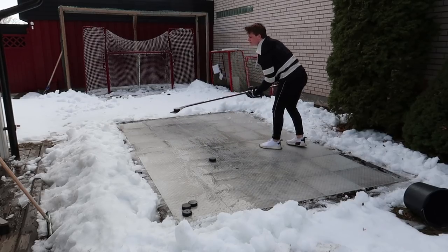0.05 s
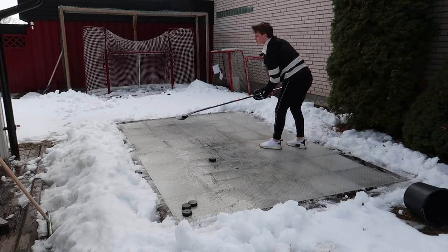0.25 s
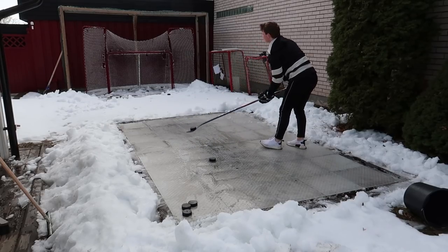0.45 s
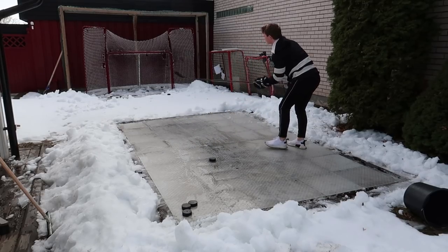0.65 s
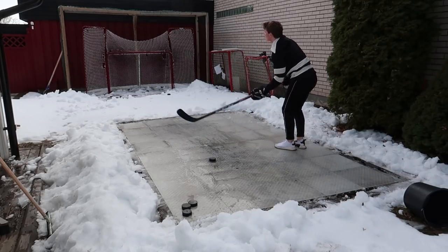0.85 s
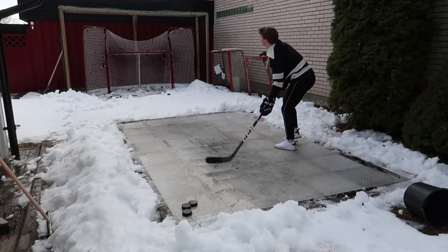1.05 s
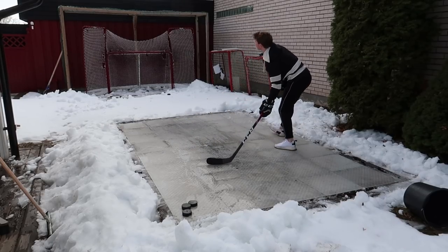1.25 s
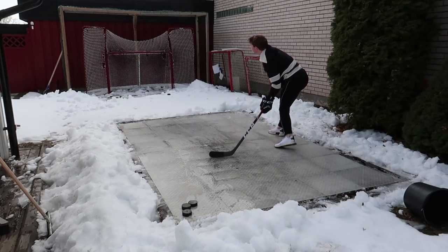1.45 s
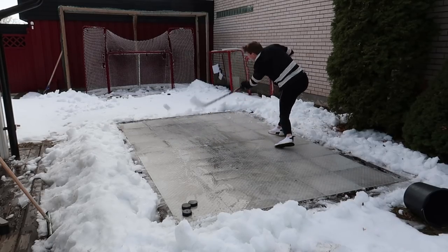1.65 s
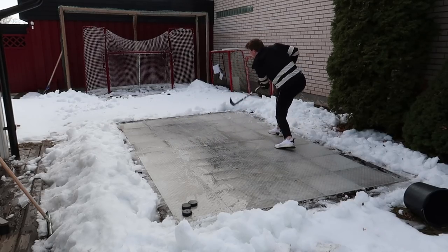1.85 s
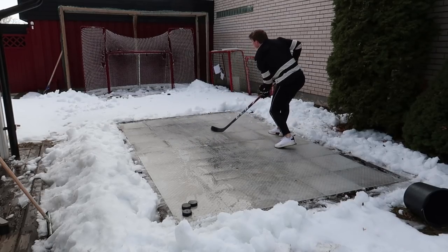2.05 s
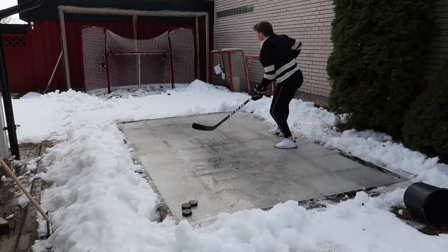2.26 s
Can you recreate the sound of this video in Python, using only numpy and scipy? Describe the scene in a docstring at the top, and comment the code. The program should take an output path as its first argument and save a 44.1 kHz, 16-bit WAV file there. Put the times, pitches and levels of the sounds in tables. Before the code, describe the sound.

A hockey stick cracks twice in a backyard: first slapping down on ice, then, after a short scrape, firing a puck. Gusty wind rumbles on the microphone until the shot, then drops away as a net rustles softly.

```python
"""Backyard, icy shooting pad: a hockey stick slaps down, drags the puck and fires it into a net.
Each contact cracks and rings blade and shaft; the two hardest overload the microphone.
House and fence echo them. Ice scrapes and sprays, shoes scuff, the mesh rustles.
Wind buffets the microphone in short, dull gusts, over faint hiss.
Wind noise and hiss both go quiet briefly after the loud shot, then return."""
import sys
import numpy as np
from scipy import signal
from scipy.fft import rfft, irfft, next_fast_len
from scipy.io import wavfile
from scipy.ndimage import uniform_filter1d, map_coordinates

SR = 44100
rng = np.random.default_rng(int(sys.argv[2]) if len(sys.argv) > 2 else 0)


def log_audio(samples):
    """Write samples as a 16-bit WAV file to the path given in sys.argv[1]."""
    # one column per channel
    frames = np.atleast_2d(samples).T
    # limit to full scale, then quantise
    limited = np.clip(frames, -1, 1)
    pcm = np.round(limited * 32767).astype(np.int16)
    wavfile.write(sys.argv[1], SR, pcm)


N = 101429

# wind at the microphone: time_s, rumble_db, flutter_db
WIND_LEVELS = [(0, -31.5, -66), (.14, -46, -58.5), (.26, -36, -49.5), (.35, -37.5, -49), (.385, -20, -33.5),
               (.435, -23.5, -33.5), (.475, -35, -48), (.49, -58, -79), (.53, -35, -68), (.58, -28, -65),
               (.635, -38.5, -58), (.68, -26, -43.5), (.725, -23.5, -60), (.75, -50, -55),
               (.81, -37.5, -73.5), (.87, -19.5, -33), (.93, -25, -26.5), (1.02, -25, -24),
               (1.1, -20.5, -31), (1.2, -26, -42.5), (1.35, -32, -37), (1.45, -25, -34.5),
               (1.6, -27, -28.5), (1.65, -25.5, -39), (1.71, -20.5, -27.5), (1.75, -44, -59.5),
               (1.82, -63, -73.5), (2.12, -70, -90.5), (2.145, -45, -82.5), (2.3, -43, -56)]
# single buffets: start_s, length_s, rumble_db, flutter_db, crackle_db
BUFFETS = [(0.031, 0.0093, -23.5, -29, -68), (0.088, 0.033, -29, -45, -70), (0.166, 0.017, -25, -42.5, -68),
           (.217, .016, -18, -31.5, -55), (0.299, 0.011, -21, -37.5, -67), (0.319, 0.013, -24.5, -41, -74),
           (0.374, 0.0072, -16.5, -18, -31), (.392, .006, -17, -27, -45), (0.416, 0.018, -17.5, -41, -55),
           (0.457, 0.016, -23, -37, -67), (0.548, 0.016, -26, -41.5, -71), (.585, 0.012, -20.5, -33, -58),
           (0.618, 0.012, -25, -51, -68), (0.653, 0.021, -21, -33, -73), (0.711, 0.0098, -22.5, -36.5, -71),
           (0.825, 0.0072, -18.5, -31, -63), (0.847, 0.0066, -17.5, -29, -50),
           (0.864, 0.017, -28, -19.5, -45), (0.91, 0.0071, -17, -21.5, -42.5),
           (0.94, 0.013, -18.5, -19.5, -34.5), (.971, 0.014, -30, -19.5, -31.5),
           (.991, 0.0048, -16.5, -14.5, -25), (1.014, .019, -15, -33, -44),
           (1.057, 0.0093, -18.5, -23.5, -28), (1.079, 0.0055, -18.5, -27, -33),
           (1.141, 0.021, -24.5, -23.5, -60), (1.207, 0.0042, -15, -24.5, -50),
           (1.261, 0.0052, -22, -37, -60), (1.499, .018, -31, -25, -34),
           (1.568, 0.047, -23.5, -25.5, -37.5), (1.854, 0.008, -44.5, -62, -80),
           (1.941, 0.034, -53, -75, -87), (2.135, 0.006, -39.5, -39.5, -38)]
# wind and hiss spectra (SIDE: left-right difference): freq_hz, relative_db
RUMBLE_SPECTRUM = [(20, -41.5), (60, -25.5), (110, -8), (200, 4.5), (300, 6.5), (450, 7.5), (650, -7.5),
                   (1000, -14), (1600, -43), (3000, -81)]
FLUTTER_SPECTRUM = [(250, -32.5), (550, 7), (850, 7), (1300, -2), (1900, -16), (2600, -28.5), (3600, -37),
                    (6000, -49.5), (15000, -69.5)]
FLUTTER_SIDE_SPECTRUM = [(60, -59), (250, -19.5), (550, 3.5), (950, 5.5), (1500, -0.5), (2200, -9.5),
                         (3600, -27), (6000, -34), (12000, -44.5)]
CRACKLE_SPECTRUM = [(400, -32), (1200, -1), (1900, 6), (2600, -8.5), (3400, -27), (6000, -44), (12000, -57)]
AIR_SPECTRUM = [(30, 8), (300, 7), (1000, 2), (2000, -4), (4000, -14.5), (8000, -23.5), (12000, -36.5),
                (16000, -47)]
AIR_SIDE_SPECTRUM = [(100, -21.5), (1000, -2.5), (2000, -2.5), (4000, -3), (8000, -7), (16000, -24)]
# outdoor hiss: time_s, level_db
AIR_LEVEL = [(0, -49.5), (1.2, -47), (1.9, -68), (2.3, -59.5)]
# ticks and clacks: start_s, level_db, pitch_hz, decay_s, hiss_re_ring_db
TICKS = [(0.169, -53, 4450, 0.0065, -14.5), (.645, -63, 13700, .003, 10.5),
         (1.2709, -11.5, 2880, 0.0028, -58)]
# shoe scuffs: peak_s, length_s, level_db
SCUFFS = [(0.213, 0.034, -51.5), (0.752, 0.029, -51.5), (1.104, 0.008, -43.5)]
# deep pushes of air: peak_s, length_s, level_db
PUSHES = [(0.227, 0.035, -25), (.40, 0.11, -29), (.592, 0.031, -32.5)]
# blade contacts: start_s, level_db, puck_share, crack_offset_db
BLOWS = [(1.2163, 1.5, 0, -8), (1.5126, -20.5, 0.6, -34), (1.6654, -14.5, 0.4, -21.5),
         (1.7024, -16, 0.6, -3.5), (1.7045, -14, 0.6, -1.5), (1.716, -11, 1, -4), (1.7206, 6, 1, -2.5),
         (1.733, -11.5, 1, -6.5)]
# blade and shaft modes: pitch_hz, t60_s, on_pad_db, on_puck_db
STICK_MODES = [(424, 0.024, 0, -13), (653, 0.025, 6, -0.5), (933, .028, 3.5, 1), (1311, .02, 7, 2),
               (1663, 0.043, -1.5, -1.5), (1862, 0.013, 6, -23.5), (2433, 0.033, -12.5, 2.5),
               (2630, 0.011, 7, -16.5), (3140, .02, -2, -5.5), (3244, 0.019, 5.5, 4.5),
               (3760, 0.024, -11.5, -4), (4560, 0.034, -11, -19.5), (4660, 0.013, -35, -18.5),
               (6210, 0.0089, -12, -27.5)]
# pad modes: pitch_hz, t60_s, offset_db
PAD_MODES = [(130, .025, -26.5), (330, 0.0089, -21)]
# blade and puck scraping: time_s, level_db
DRAG_LEVEL = [(1.22, -54), (1.24, -38), (1.33, -44), (1.39, -53), (1.5, -53), (1.53, -41), (1.58, -38.5),
              (1.62, -37.5), (1.64, -33.5), (1.66, -38), (1.695, -34.5), (1.73, -39), (1.75, -59.5)]
# puck in the net: start_s, level_db, attack_s, decay_s
NET_HITS = [(2.016, -43.5, 0.04, 0.033), (2.085, -53, 0.0043, 0.055), (2.127, -50, 0.0072, 0.034)]
# contact and echo spectra: freq_hz, relative_db
CRACK_SPECTRUM = [(100, -19.5), (500, -2.5), (1500, 0.5), (3500, -1), (5500, -8), (9000, -23), (13000, -26),
                  (16000, -39.5)]
SCRAPE_SPECTRUM = [(400, -22), (1000, -10), (2000, -1.5), (3400, -3), (4800, -12.5), (7000, -19.5),
                   (10000, -41), (15000, -55.5)]
SPRAY_SPECTRUM = [(2000, -20), (5000, 5), (8000, -1), (12500, 0), (14000, -13), (16000, -17)]
NET_SPECTRUM = [(300, -20), (900, -2), (2200, 3.5), (4000, -4), (6000, -6), (8500, -16.5), (12000, -40)]
YARD_SPECTRUM = [(150, -16), (500, -17.5), (1000, -3), (2000, 3), (3500, 0), (6000, 3), (9000, -10.5),
                 (14000, -42)]
# wall echoes: delay_s, smear_s, level_db
ECHOES = [(0.013, 0.003, -24), (0.0469, 0.0041, -25), (0.0544, .006, -25.5), (.077, .009, -36),
          (0.109, 0.019, -38.5)]
# phase lead of the left microphone port: freq_hz, lead_rad
PORT_PHASE = [(0, 0), (1300, -1.1), (2500, 0.45), (4000, 1.1), (5500, 1.65), (10000, 1.8), (14000, 2.1)]
# stereo width as the blade moves off axis: time_s, side_db
BLADE_WIDTH = [(1.22, -8.5), (1.7, -0.5)]


def undb(db):
    """Decibels to gain."""
    return 10 ** (np.asarray(db) / 20)


def curve(table, column=1):
    """Table column, interpolated linearly in time."""
    rows = np.array(table)
    return np.interp(np.arange(N) / SR, rows[:, 0], rows[:, column])


def colour(x, spectrum):
    """Minimum-phase filter; white noise keeps its power."""
    size = 2 * next_fast_len(N)
    hz, db = np.array(spectrum).T
    bins_hz = np.arange(size // 2 + 1) * SR / size
    gain = undb(np.interp(np.log(bins_hz + 1), np.log(hz), db))
    gain /= np.sqrt(np.mean(gain ** 2))
    cepstrum = irfft(np.log(gain))
    cepstrum[1:size // 2] *= 2
    cepstrum[size // 2 + 1:] = 0
    return irfft(rfft(x, size) * np.exp(rfft(cepstrum)))[..., :N]


def grains(rate_per_s, spread_db):
    """Random pulses of uneven size, rms 1."""
    pulses = (rng.random(N) < rate_per_s / SR) * rng.choice([-1, 1], N)
    pulses = pulses * undb(spread_db * rng.standard_normal(N))
    return pulses / pulses.std()


def flicker(rate_hz=90, step_db=3):
    """Quick random level swings, as a gain."""
    hold = int(SR / rate_hz)
    steps = np.repeat(rng.standard_normal(N // hold + 1), hold)[:N]
    return undb(step_db * uniform_filter1d(steps, hold // 2))


def swells(t, table):
    """Sum of bell-shaped envelopes."""
    return sum(undb(db) * np.exp(-(2 * (t - peak_s) / length_s) ** 2) for peak_s, length_s, db in table)


def stereo(mid, side):
    """Mid/side to left/right."""
    return np.array([mid + side, mid - side])


def eddies(mid_spectrum, side_spectrum, rate_per_s, side_gain):
    """Eddies thump the microphone: filtered pulses, levelled over 10 ms."""
    def stream(spectrum):
        thumps = colour(grains(rate_per_s, spread_db=4), spectrum)
        return thumps / np.sqrt(uniform_filter1d(thumps ** 2, size=440) + 1e-6)
    return stereo(stream(mid_spectrum), side_gain * stream(side_spectrum))


def wind(t, rise_s=0.002, fall_s=0.004):
    """Gusts rumble and flutter on the microphone; sudden buffets add crackle."""
    swing = flicker()
    buffets = np.zeros((3, N))
    for start_s, length_s, *levels_db in BUFFETS:
        rise = np.clip((t - start_s) / rise_s + 0.5, 0, 1)
        fall = np.exp(-np.maximum(t - start_s - length_s, 0) / fall_s)
        buffets += np.outer(undb(levels_db), rise * fall)
    rumble_buffets, flutter_buffets, crackle_gain = buffets
    rumble_gain = np.hypot(swing * undb(curve(WIND_LEVELS, column=1)), rumble_buffets)
    flutter_gain = np.hypot(swing * undb(curve(WIND_LEVELS, column=2)), flutter_buffets)
    rumble = eddies(RUMBLE_SPECTRUM, RUMBLE_SPECTRUM, rate_per_s=700, side_gain=0.039)
    flutter = eddies(FLUTTER_SPECTRUM, FLUTTER_SIDE_SPECTRUM, rate_per_s=1300, side_gain=0.44)
    crackle = eddies(CRACKLE_SPECTRUM, CRACKLE_SPECTRUM, rate_per_s=600, side_gain=0.44)
    return rumble * rumble_gain + flutter * flutter_gain + crackle * crackle_gain


def air(side_db=-13.5):
    """Faint outdoor hiss, wide in the treble."""
    mid, side = rng.standard_normal((2, N))
    hiss = stereo(colour(mid, AIR_SPECTRUM), undb(side_db) * colour(side, AIR_SIDE_SPECTRUM))
    return hiss * undb(curve(AIR_LEVEL))


def ticks(t, rise_s=0.0013):
    """Bright ticks and clacks: short ring plus hiss."""
    hiss = colour(rng.standard_normal(N), SPRAY_SPECTRUM)
    out = np.zeros(N)
    for start_s, db, hz, decay_s, hiss_db in TICKS:
        age_s = np.maximum(t - start_s, 0)
        envelope = undb(db) * np.minimum(age_s / rise_s, 1) * np.exp(-age_s / decay_s)
        out += envelope * (np.sin(2 * np.pi * hz * age_s) + undb(hiss_db) * hiss)
    return out


def shoes(t):
    """Soles shift on gritty ice."""
    return colour(rng.standard_normal(N), SCRAPE_SPECTRUM) * swells(t, SCUFFS)


def pushes(t, band_hz=(82, 256)):
    """Broad gusts press on the microphone: deep, soft thumps."""
    bandpass = signal.butter(2, band_hz, "bandpass", fs=SR, output="sos")
    rumble = signal.sosfilt(bandpass, rng.standard_normal(N))
    return rumble / rumble.std() * swells(t, PUSHES)


def stick(t, ring_db=-6.5, crack_decay_s=0.0034):
    """Contacts crack and ring the stick; pad or puck sets the mix of modes."""
    out = np.zeros(N)
    noise = colour(rng.standard_normal(N), CRACK_SPECTRUM)
    for start_s, db, puck_share, crack_db in BLOWS:
        onset = int(start_s * SR)
        age_s = t[:min(SR // 6, N - onset)]
        span = slice(onset, onset + len(age_s))
        ring = 0
        for k, (hz, t60_s, pad_db, puck_db) in enumerate(STICK_MODES):
            mode_db = pad_db + puck_share * (puck_db - pad_db)
            ring += (-1) ** k * undb(mode_db - 60 * age_s / t60_s) * np.sin(2 * np.pi * hz * age_s)
        crack = noise[span] * np.exp(-age_s / crack_decay_s)
        out[span] += undb(db) * (undb(ring_db) * ring + undb(crack_db) * crack)
    return out


def pad(t):
    """The pad thuds under each blow, too low and weak to echo."""
    out = np.zeros(N)
    for start_s, db, _, _ in BLOWS:
        age_s = np.maximum(t - start_s, 0)
        for hz, t60_s, offset_db in PAD_MODES:
            out += undb(db + offset_db - 60 * age_s / t60_s) * np.sin(2 * np.pi * hz * age_s)
    return out


def drag():
    """Blade and puck scrape over ice grains."""
    level_db = curve(DRAG_LEVEL)
    sliding = level_db > max(DRAG_LEVEL[0][1], DRAG_LEVEL[-1][1])
    scrape = colour(grains(rate_per_s=2600, spread_db=2), SCRAPE_SPECTRUM)
    return scrape * undb(level_db) * sliding * flicker()


def yard(x, t, tail_db=-26.5, build_s=0.031, split_hz=3300, low_t60_s=0.59, high_t60_s=0.39):
    """Smeared echoes off house and fence, then a diffuse tail; treble dies first."""
    echo_power = np.zeros(N)
    for delay_s, smear_s, db in ECHOES:
        burst = (t > delay_s) * np.exp(-2 * np.abs(t - delay_s) / smear_s)
        echo_power += undb(db) ** 2 * burst / burst.sum()
    early, late = colour(rng.standard_normal((2, N)), YARD_SPECTRUM)
    low = signal.sosfiltfilt(signal.butter(2, split_hz, fs=SR, output="sos"), late)
    tail = low * undb(-60 * t / low_t60_s) + (late - low) * undb(-60 * t / high_t60_s)
    tail *= np.clip(t / build_s, 0, 1)
    response = early * np.sqrt(echo_power) + undb(tail_db) * tail / np.linalg.norm(tail)
    return signal.fftconvolve(x, response)[:N]


def blur_echoes(x, t, rate_hz=60, step_s=0.0005):
    """A small random delay wobble blurs the echoes into a diffuse tail."""
    hold = int(SR / rate_hz)
    steps = np.repeat(rng.standard_normal(N // hold + 1), hold)[:N]
    shift_s = step_s * uniform_filter1d(steps, hold)
    return map_coordinates(x, [(t + shift_s) * SR], mode="nearest")


def spray(t, peak_s=1.724, slope_s=0.006, level_db=-11):
    """Brief bright hiss as the blade whips off the ice."""
    envelope = undb(level_db) * np.exp(-np.abs(t - peak_s) / slope_s)
    return colour(rng.standard_normal(N), SPRAY_SPECTRUM) * envelope


def net(t):
    """The mesh rustles as it catches the puck and swings back."""
    envelope = np.zeros(N)
    for start_s, db, attack_s, decay_s in NET_HITS:
        rise = np.clip((t - start_s) / attack_s, 0, 1)
        fall = np.exp(-np.maximum(t - start_s - attack_s, 0) / decay_s)
        envelope += undb(db) * rise * fall
    return colour(grains(rate_per_s=2500, spread_db=1), NET_SPECTRUM) * envelope


def ports(x, side_gain=1):
    """Treble reaches the two microphone ports out of phase."""
    bins_hz = np.arange(N + 1) * SR / (2 * N)
    half_lead_rad = np.interp(bins_hz, *np.array(PORT_PHASE).T) / 2
    spectrum = rfft(x, 2 * N)
    mid = irfft(spectrum * np.cos(half_lead_rad))[:N]
    side = irfft(1j * spectrum * np.sin(half_lead_rad))[:N]
    return stereo(mid, side_gain * side)


def scene():
    """Stick, puck and net in the yard; wind on the microphone."""
    t = np.arange(N) / SR
    blade = stick(t) + drag()
    direct = ports(blade + spray(t), side_gain=undb(curve(BLADE_WIDTH)))
    echoes = blur_echoes(yard(blade, t), t)
    surroundings = ports(echoes + net(t) + shoes(t))
    return direct + surroundings + pad(t) + ticks(t) + wind(t) + pushes(t) + air()


def record(dry, mono_below_hz=180, top_hz=15800):
    """The recorder soft-clips the cracks, centres the bass and cuts the top."""
    left, right = dry / (1 + np.abs(dry) ** 8) ** (1 / 8)
    highpass = signal.butter(2, mono_below_hz, "highpass", fs=SR, output="sos")
    lowpass = signal.ellip(8, 0.2, 70, top_hz, fs=SR, output="sos")
    side = signal.sosfiltfilt(highpass, (left - right) / 2)
    return signal.sosfilt(lowpass, stereo((left + right) / 2, side))


dry = scene()
out = record(dry)
log_audio(out)
```